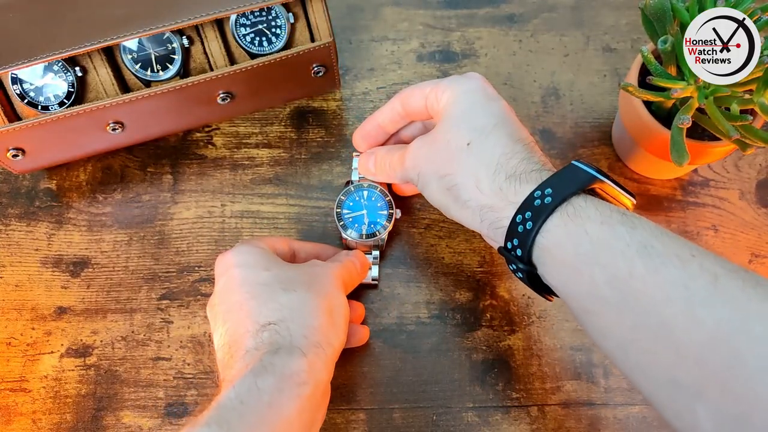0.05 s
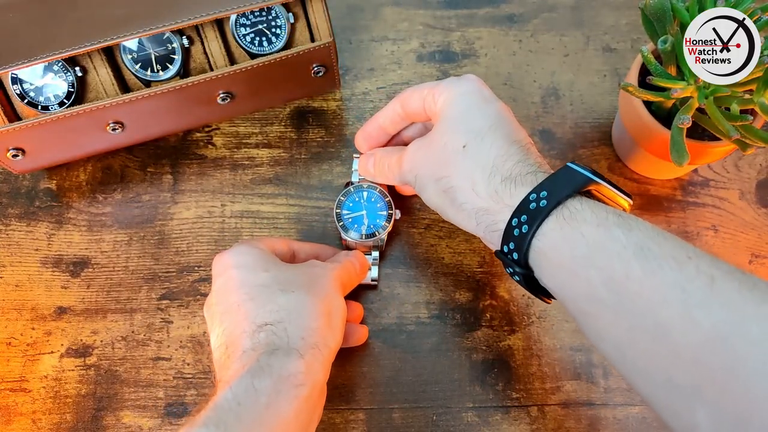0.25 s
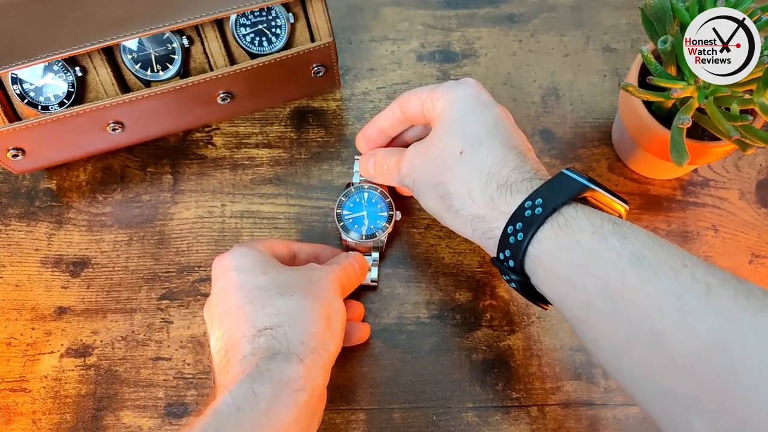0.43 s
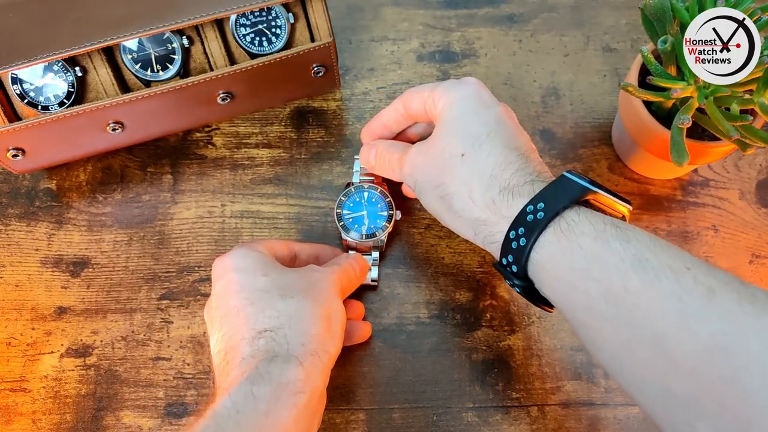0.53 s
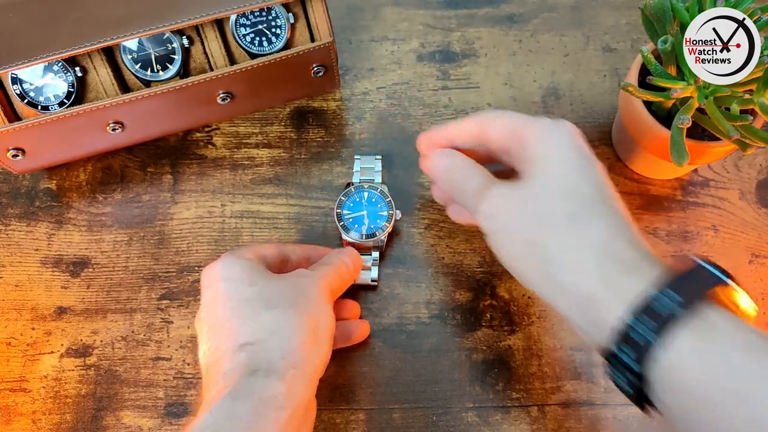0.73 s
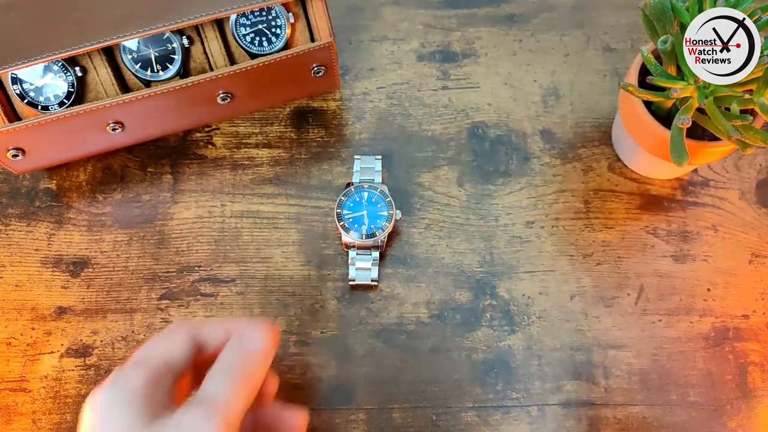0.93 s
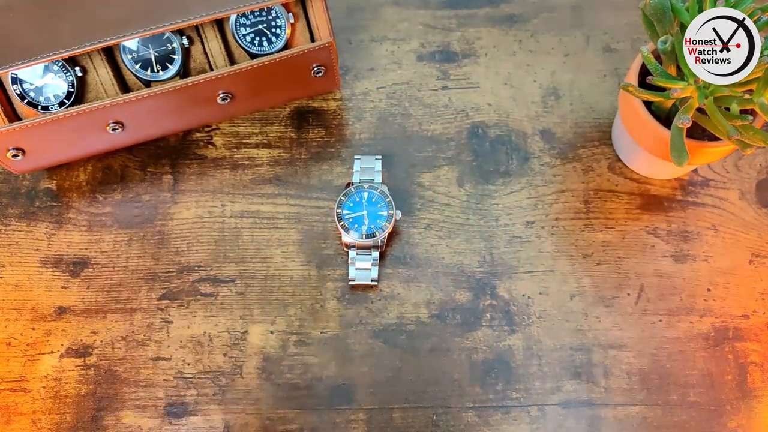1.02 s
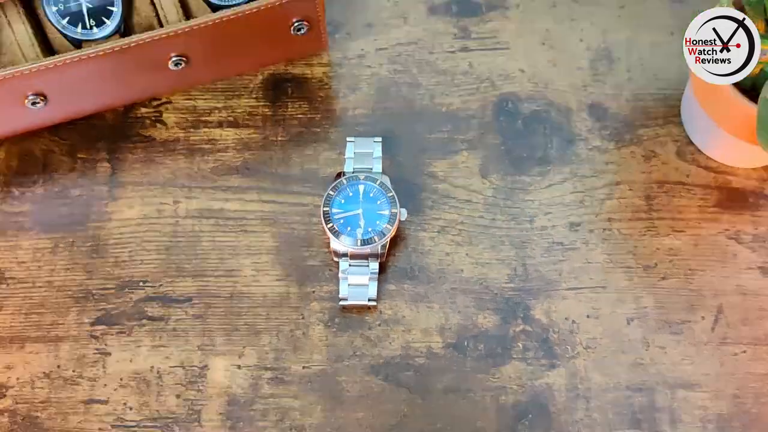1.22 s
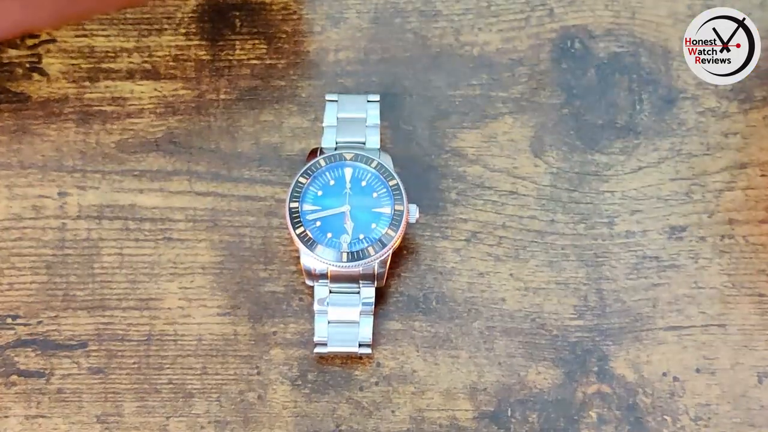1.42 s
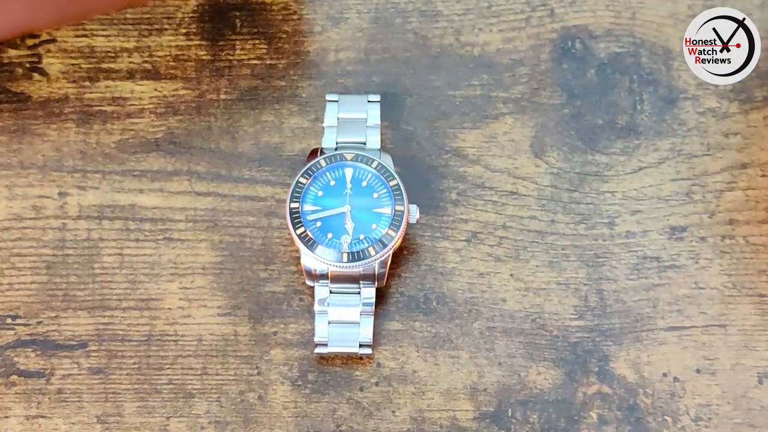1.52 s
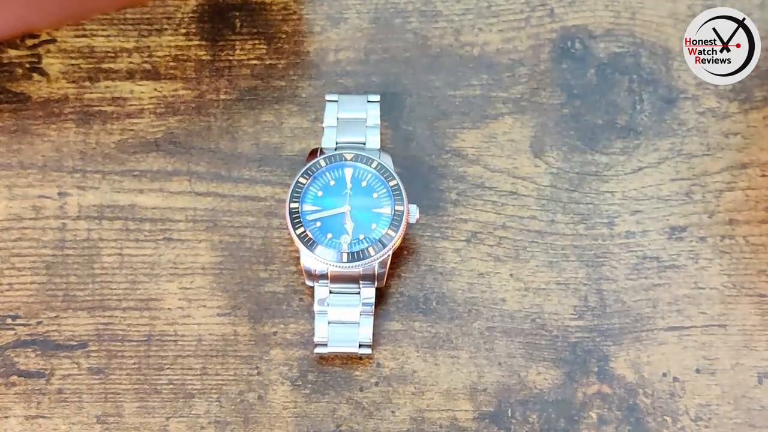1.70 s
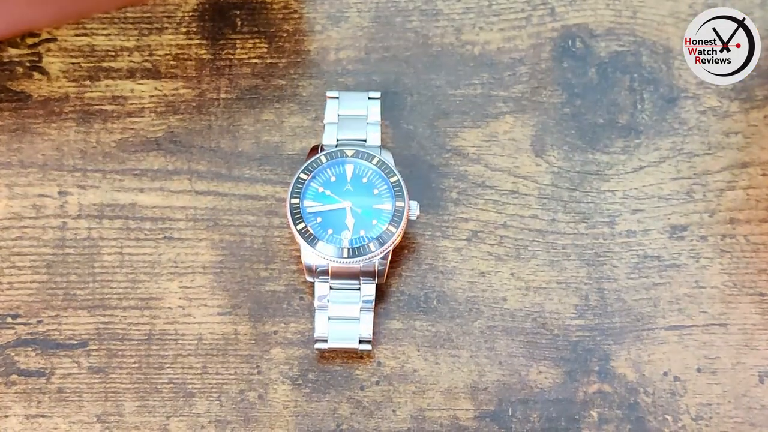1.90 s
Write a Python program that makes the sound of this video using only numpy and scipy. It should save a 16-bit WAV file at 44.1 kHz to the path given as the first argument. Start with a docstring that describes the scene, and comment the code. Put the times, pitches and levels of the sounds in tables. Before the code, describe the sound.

A metal watch with a link bracelet is set down on a wooden table, making two quick clicks with a brief ring. The links settle faintly afterwards, heard close up in a small, quiet room.

```python
"""Steel watch set down on a wooden table.

A small room, one microphone close above the tabletop. The link bracelet lands with two quick clicks:
the links clack and ring, the wood knocks, the room answers. Just before, a low room echo fades and a
thin whistle wavers; afterwards the links settle and the hands withdraw with a soft swish."""
import sys
import numpy as np
from scipy import signal
from scipy.io import wavfile
from scipy.ndimage import uniform_filter1d

SR = 44100
rng = np.random.default_rng(int(sys.argv[2]) if len(sys.argv) > 2 else 0)


def transcribe(signal):
    """Save signal, clipped to [-1, 1], as a 16-bit WAV file at the path in sys.argv[1]."""
    frames = np.atleast_2d(signal).T
    limited = np.clip(frames, -1, 1)
    pcm = np.round(limited * 32767).astype(np.int16)
    wavfile.write(sys.argv[1], SR, pcm)


N = 85995
T = np.arange(N) / SR
KNOCK_S, CLINK_S = .2475, .2485  # the first click knocks the wood, the second rings steel and room

# steel meets wood below the microphone, two main clicks amid lighter chatter (time [s], level [dB])
CONTACTS = [(0.2454, -36.5), (.2477, -21), (0.2487, -13), (.2510, -23)]
# short resonances of the links (frequency [Hz], relative level [dB], t60 [s])
CLACK_MODES = [(250, -25.5, .04), (520, -21, .03), (780, -16, .025), (1200, -21, .012), (1745, -20.5, .014),
               (2190, -11, .022), (3200, -10, .011), (4390, -3, .014), (5540, -9.5, .012), (6100, -8, .011),
               (6950, -4.5, .007), (8760, -16.5, .008), (10050, -16.5, .006), (15300, -18.5, .008)]
# bright crack of steel on the surface (frequency [Hz], relative density [dB])
CRACK_COLOUR = [(1500, -13.5), (3000, -3), (5000, -0.5), (8000, 4.5), (11500, -3), (13500, -11),
                (15500, -11)]


def link_clacks():
    """Each contact with the wood gives a bright crack and briefly rings the links."""
    clicks = strikes(*np.transpose(CONTACTS))
    crack = from_db(-8) * decay(t60=.018) * noise(CRACK_COLOUR)
    return ring(clicks, CLACK_MODES) + signal.fftconvolve(clicks, crack)[:N]


# lasting resonances of case and bracelet (frequency [Hz], level [dB], t60 [s])
STEEL_MODES = [(1479, -45.5, 0.16), (1680, -42, 0.21), (1770, -38, 0.1), (2210, -36.5, 0.12),
               (2714, -36, .18), (2984, -43, .19), (3914, -39, .2), (4003, -38, .19), (4294, -40, 0.2),
               (4400, -40.5, .21), (4580, -42, 0.3), (4914, -39, 0.21), (6098, -43.5, .16)]


def steel_ring():
    """The second click leaves case and bracelet ringing."""
    return ring(strikes([CLINK_S]), STEEL_MODES)


# resonances of the wood under the watch (frequency [Hz], level [dB], t60 [s])
TABLE_MODES = [(43, -37.5, 0.43), (57, -36.5, 0.16), (143, -47, 0.29), (160, -43.5, 0.36),
               (245, -45.5, 0.37), (275, -47.5, 0.31), (330.8, -44, 0.3), (460.6, -47.5, 0.32),
               (502, -43, .21), (529, -36.5, 0.25), (751.3, -39.5, .2), (812, -49, .3), (862, -48, .2),
               (1031, -46, 0.25)]


def table_knock():
    """The first click carries the weight of the watch into the tabletop."""
    return ring(strikes([KNOCK_S]), TABLE_MODES)


# the small room as heard from above the table (frequency [Hz], relative density [dB])
ROOM_COLOUR = [(100, -12), (200, -4.5), (400, -6.5), (800, -7.5), (1300, -3.5), (2100, -2), (3300, 0.5),
               (4400, 3), (6500, -5), (8000, -8), (11000, -14.5), (13500, -18.5), (15400, -19)]
# its reverberation time (frequency [Hz], t60 [s])
ROOM_T60 = [(100, 0.42), (300, 0.2), (1000, .245), (2000, 0.25), (4500, 0.15), (8000, .165), (15000, 0.19)]


def room_answer():
    """Dense reflections, partly coloured by the clack, follow the click and last longest in the bass."""
    echoes = rng.standard_normal(N) * from_db(-44) * decay(t60=.18)
    tail = from_db(-27.2) * noise(ROOM_COLOUR, ROOM_T60) + ring(echoes, CLACK_MODES)
    build_up = 1 - np.exp(-T / .00075)
    return np.pad(tail * build_up, (int(CLINK_S * SR), 0))[:N]


# faint scrape at the tabletop before the drop (time [s], level [dB])
SCRAPE_LEVEL = [(0, -74), (.1, -75), (.17, -73.5), (.21, -65.5), (.245, -62.5), (.27, -110)]
# its narrow bands (frequency [Hz], width [Hz], relative level [dB])
SCRAPE_BANDS = [(490, 120, -0.5), (1850, 350, -7), (3500, 300, -14)]


def scrape():
    """The watch scrapes in three bands of noise while it is steadied."""
    bands = 0
    for hz, width, db in SCRAPE_BANDS:
        b, a = signal.iirpeak(hz, hz / width, fs=SR)
        band = signal.lfilter(b, a, signal.lfilter(b, a, rng.standard_normal(N)))
        bands = bands + from_db(db) * band / band.std()
    return level(SCRAPE_LEVEL) * bands


# link against link, swelling into the drop (time [s], level [dB])
RUB_LEVEL = [(.211, -91.5), (.216, -60), (.232, -66), (.24, -51), (.247, -45), (.252, -84.5)]
# its spectrum (frequency [Hz], relative density [dB])
RUB_COLOUR = [(60, 4.5), (200, 0.5), (500, 2), (900, -7), (2000, -7.5), (4000, -12.5), (7000, -15.5),
              (15000, -18.5)]


def link_rub():
    """The links rub together as the fingers let go."""
    end_s = RUB_LEVEL[-1][0]
    return level(RUB_LEVEL) * noise(RUB_COLOUR) * (T < end_s)


# the bracelet coming to rest on the wood (time [s], level [dB])
SETTLE_LEVEL = [(.25, -86), (.335, -81), (.36, -69.5), (.41, -71), (.46, -77.5), (.52, -100)]
# its spectrum (frequency [Hz], relative density [dB])
SETTLE_COLOUR = [(400, -2), (800, 5), (1500, -2), (4500, 2.5), (8000, -1.5), (11000, -3.5), (15000, -1)]


def links_settling():
    """The links shift after the drop with a fine, grainy sizzle."""
    return level(SETTLE_LEVEL) * noise(SETTLE_COLOUR) * from_db(3.5 * wobble(samples=90))


# fingertip on steel (frequency [Hz], relative density [dB])
TOUCH_COLOUR = [(1500, -22), (3200, 0), (4600, -11), (6200, 1.5), (7500, -16), (11000, -25)]


def fingertip_touch(start_s=.451, rise_s=.002, t60=.083):
    """A fingertip brushes the resting bracelet once."""
    age = np.maximum(T - start_s, 0)
    envelope = from_db(-69 - 60 * age / t60) * np.minimum(age / rise_s, 1)
    return envelope * noise(TOUCH_COLOUR)


# thin whistle in the room (time [s], pitch [Hz])
WHISTLE_PITCH = [(0, 7999.5), (.03, 7977), (.065, 7744.5), (.1, 7277), (.125, 7188.5), (.17, 7681),
                 (.195, 7728.5), (.22, 7415.5), (.245, 6999)]
# its loudness at the microphone (time [s], level [dB])
WHISTLE_LEVEL = [(0, -73), (.015, -65.5), (.06, -68.5), (.12, -69.5), (.19, -70.5), (.22, -62),
                 (.245, -66.5)]
# partials at and just below the pitch (frequency ratio, relative level [dB])
WHISTLE_CORE = [(1, -1.5), (0.97, -17.5), (.92, -14)]
# partials above it (frequency ratio, relative level [dB])
WHISTLE_OVERTONES = [(1.29, -19.5), (1.51, -11.5)]


def whistle(end_s=.245, jitter=.004, flutter_db=1, overtone_db_per_khz=17):
    """A faint, high, unsteady tone, smeared by the room, stops as the watch lands."""
    hz = np.interp(T, *np.transpose(WHISTLE_PITCH))
    phase = 2 * np.pi * np.cumsum(hz * (1 + jitter * wobble(samples=40))) / SR

    def partials(rows):
        return sum(from_db(db + flutter_db * wobble(samples=500)) * np.sin(ratio * phase)
                   for ratio, db in rows)

    offset_khz = (hz - np.mean(WHISTLE_PITCH, axis=0)[1]) / 1000
    overtone_gain = from_db(overtone_db_per_khz * offset_khz)  # overtones fade as the pitch sags
    envelope = level(WHISTLE_LEVEL) * np.clip((end_s - T) / .008, 0, 1)
    tone = envelope * (partials(WHISTLE_CORE) + overtone_gain * partials(WHISTLE_OVERTONES))
    echoes = rng.standard_normal(N) * decay(at_hz(ROOM_T60, hz.mean()))
    reverb = signal.fftconvolve(tone, echoes / np.linalg.norm(echoes))[:N]
    return tone + from_db(-11.5) * reverb


# low echo lingering in the room (frequency [Hz], relative density [dB])
ROOM_RING_COLOUR = [(40, 5), (90, -20), (140, -14), (200, -8), (280, -1), (400, -13), (520, -6.5),
                    (1100, -12.5), (2400, -11.5), (4500, -17.5), (6500, -41.5), (15000, -36)]
# its ringing tones (frequency [Hz], level [dB], t60 [s])
ROOM_RING_MODES = [(141, -54, 0.3), (272, -48.5, .17), (768, -58, .15)]


def dying_room_ring():
    """A low room echo with three ringing tones fades at the start."""
    echo = from_db(-48.5) * decay(t60=.13) * noise(ROOM_RING_COLOUR)
    return echo + ring(strikes([0]), ROOM_RING_MODES)


# hands leaving the tabletop (time [s], level [dB])
SWISH_LEVEL = [(.6, -93), (.8, -82), (.94, -80), (.975, -75.5), (1.06, -70), (1.085, -101)]
# their spectrum (frequency [Hz], relative density [dB])
SWISH_COLOUR = [(200, -8.5), (1000, -2.5), (2000, -3.5), (3800, 3.5), (5500, -2), (8000, -0.5),
                (15000, -3.5)]


def hand_swish():
    """Skin slides over wood as the hands withdraw."""
    return level(SWISH_LEVEL) * noise(SWISH_COLOUR)


# arms moving near the microphone (time [s], level [dB])
ARMS_LEVEL = [(0, -63.5), (.2, -71.5), (.5, -84), (.72, -79), (.95, -73.5), (1.1, -84), (1.4, -87),
              (1.95, -76.5)]
# their spectrum (frequency [Hz], relative density [dB])
ARMS_COLOUR = [(80, -7.5), (150, -6.5), (230, -10.5), (320, 1.5), (500, 2), (700, -9.5), (1900, -15),
               (3500, -22), (7000, -32.5)]


def arm_rustle():
    """The arms rustle, soft and low, as they move."""
    return level(ARMS_LEVEL) * noise(ARMS_COLOUR)


# rumble at the microphone, strongest as the watch lands (time [s], level [dB])
RUMBLE_LEVEL = [(.1, -68.5), (.21, -77), (.24, -50.5), (.33, -52), (.36, -62), (.6, -81.5), (.69, -66.5),
                (.8, -80.5), (.89, -59), (1.0, -72), (1.08, -62.5), (1.26, -68.5), (1.42, -75), (1.59, -67),
                (1.7, -78), (1.89, -75.5), (1.93, -58.5)]
# its spectrum (frequency [Hz], relative density [dB])
RUMBLE_COLOUR = [(20, -7), (42, 1), (70, -9.5), (100, -20.5), (150, -20), (400, -54)]


def stand_rumble():
    """Low vibration travels up the microphone stand."""
    return level(RUMBLE_LEVEL) * noise(RUMBLE_COLOUR)


# noise floor of room and microphone (frequency [Hz], relative density [dB])
FLOOR_COLOUR = [(25, 1), (45, -7), (70, -12), (105, -14.5), (150, -9.5), (200, -18.5), (320, -19.5),
                (520, -25), (900, -23.5), (1660, -28), (3000, -30.5), (5250, -38), (8000, -36.5),
                (12000, -30.5), (15800, -29)]


def room_tone():
    """The quiet room and the microphone's own hiss lie steadily under everything."""
    return from_db(-74) * noise(FLOOR_COLOUR)


def from_db(db):
    """Decibels to gain."""
    return 10 ** (np.asarray(db) / 20)


def decay(t60):
    """Gain that falls 60 dB every t60 seconds."""
    return from_db(-60 * T / t60)


def at_hz(points, hz):
    """Read a table on a log-frequency axis."""
    freqs, values = np.transpose(points)
    return np.interp(np.log(hz), np.log(freqs), values)


def level(rows):
    """Gain over time from rows of (time [s], level [dB])."""
    return from_db(np.interp(T, *np.transpose(rows)))


def noise(colour, t60=None):
    """Third-octave bands of noise, rms 1; with a t60 table each band dies at its own rate."""
    edges = np.geomspace(18, 17500, num=31)
    white = rng.standard_normal((2, N + 8000))
    steady = out = 0
    for k, (low, high) in enumerate(zip(edges, edges[1:])):
        hz = np.sqrt(low * high)
        bandpass = signal.butter(2, [low, high], "band", fs=SR, output="sos")
        band = from_db(at_hz(colour, hz)) * signal.sosfilt(bandpass, white[k % 2])[-N:]
        steady = steady + band
        out = out + (band if t60 is None else band * decay(at_hz(t60, hz)))
    return out / np.std(steady)


def wobble(samples):
    """Random drift smoothed over a number of samples, spread 1."""
    slow = uniform_filter1d(rng.standard_normal(N), size=samples)
    return slow / slow.std()


def strikes(times, db=0):
    """One impulse at each given time."""
    out = np.zeros(N)
    np.add.at(out, (np.asarray(times) * SR).astype(int), from_db(db))
    return out


def ring(drive, modes):
    """The drive sets decaying sines ringing, neighbours in opposite directions."""
    out = 0
    for k, (hz, db, t60) in enumerate(modes):
        radius, angle = from_db(-60 / (t60 * SR)), 2 * np.pi * hz / SR
        poles = [1, -2 * radius * np.cos(angle), radius ** 2]
        mode = signal.lfilter([0, np.sin(angle)], poles, drive + 1e-18)
        out = out + (-1) ** k * from_db(db) * mode
    return out


def scene():
    """Everything at one microphone above the table."""
    landing = link_clacks() + steel_ring() + table_knock() + room_answer()
    bracelet = scrape() + link_rub() + links_settling() + fingertip_touch()
    faint_sounds = whistle() + dying_room_ring() + hand_swish() + arm_rustle()
    return (landing + bracelet + faint_sounds + stand_rumble() + room_tone())[None]


def record(dry):
    """The recorder cuts the treble steeply above 15.9 kHz."""
    return signal.sosfilt(signal.ellip(10, .1, 80, 15900, fs=SR, output="sos"), dry)


dry = scene()
out = record(dry)
transcribe(out)
```